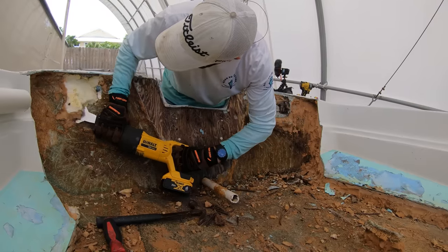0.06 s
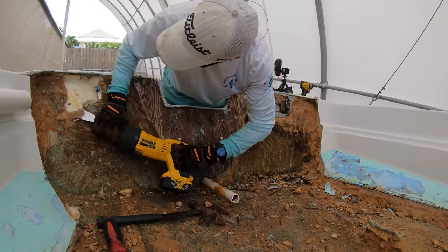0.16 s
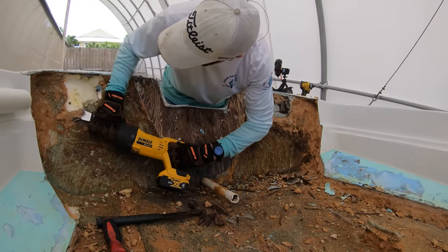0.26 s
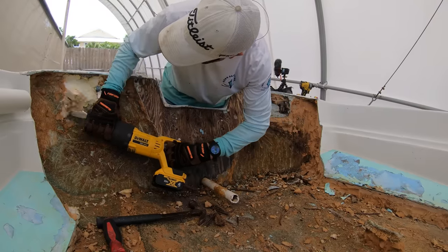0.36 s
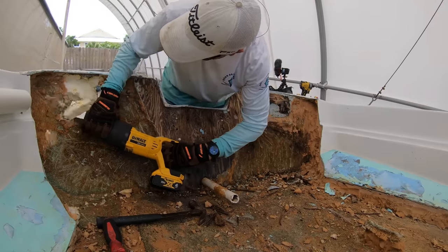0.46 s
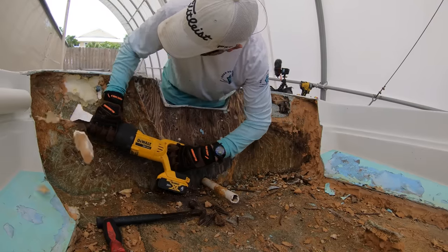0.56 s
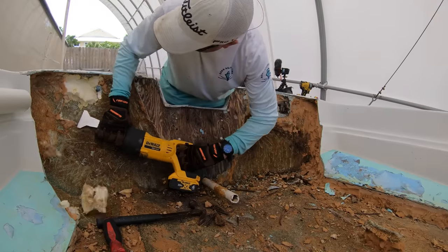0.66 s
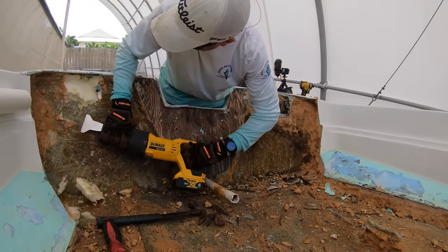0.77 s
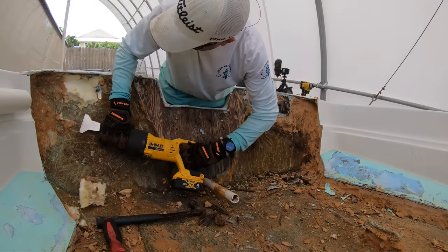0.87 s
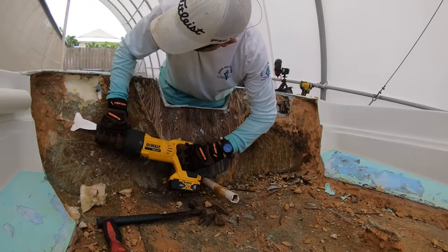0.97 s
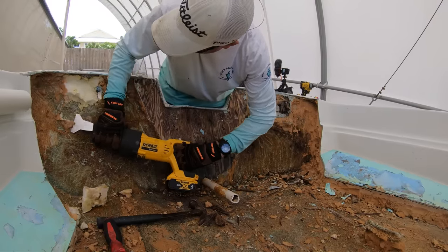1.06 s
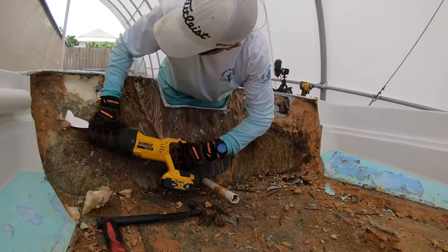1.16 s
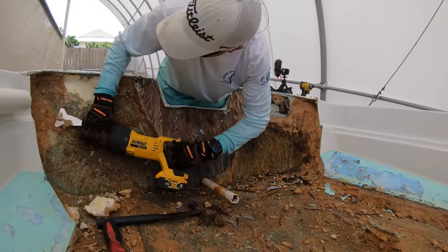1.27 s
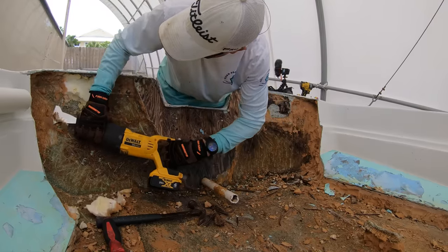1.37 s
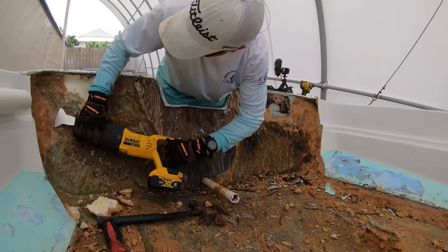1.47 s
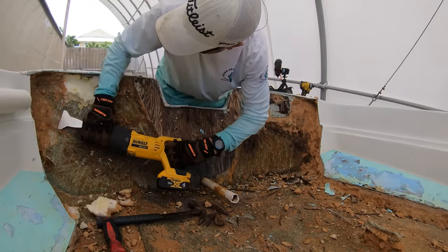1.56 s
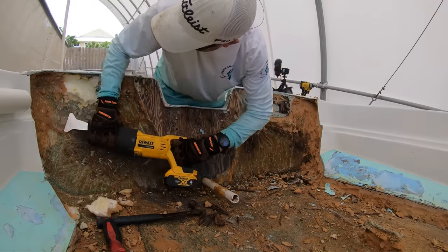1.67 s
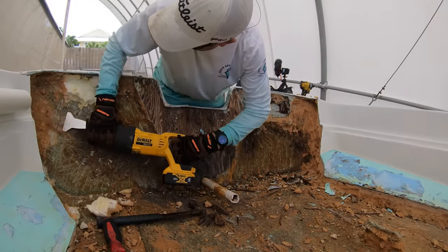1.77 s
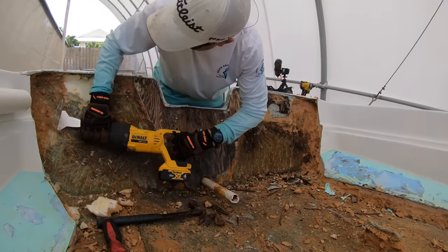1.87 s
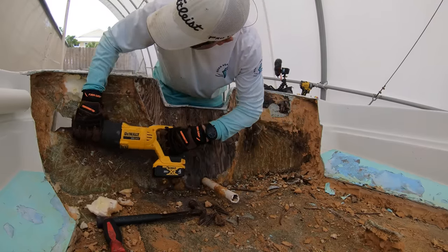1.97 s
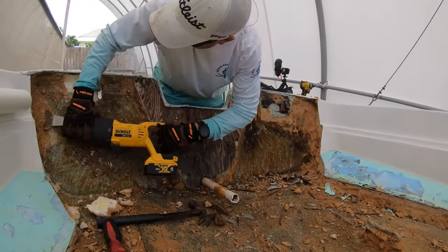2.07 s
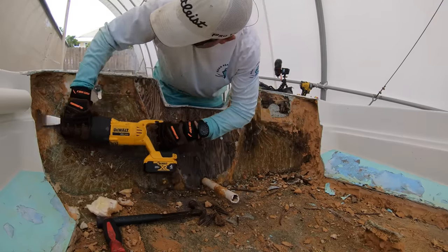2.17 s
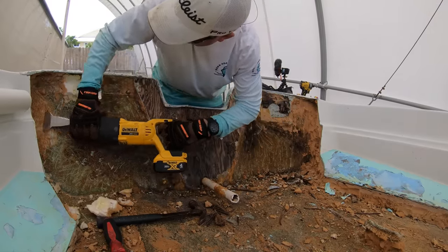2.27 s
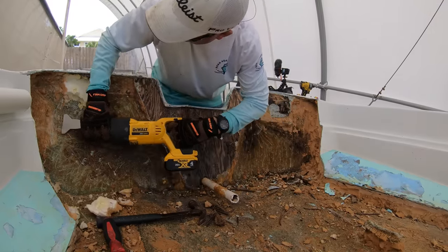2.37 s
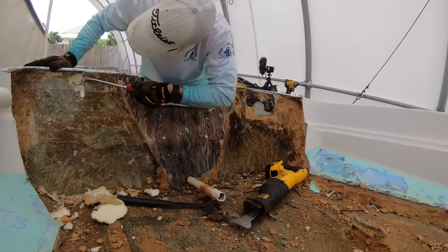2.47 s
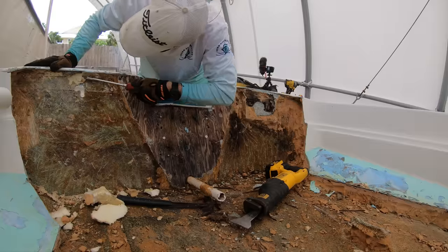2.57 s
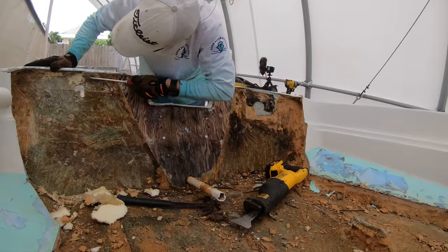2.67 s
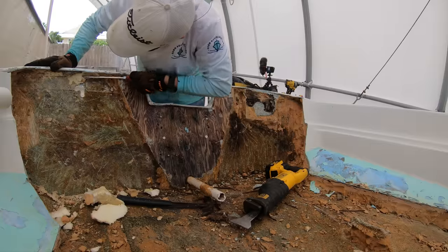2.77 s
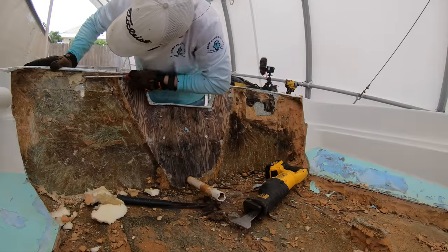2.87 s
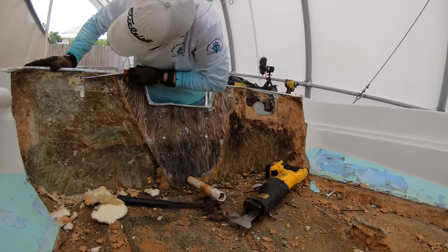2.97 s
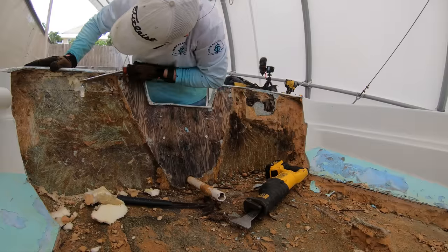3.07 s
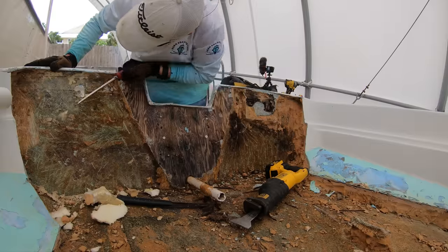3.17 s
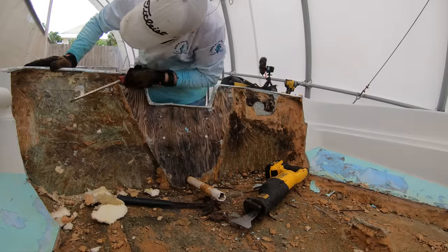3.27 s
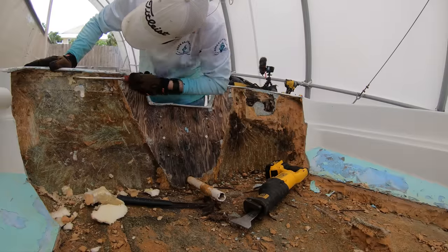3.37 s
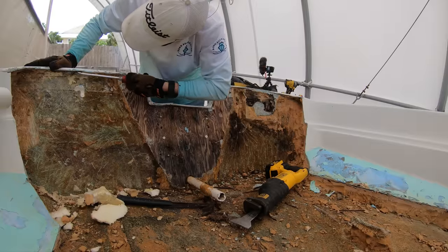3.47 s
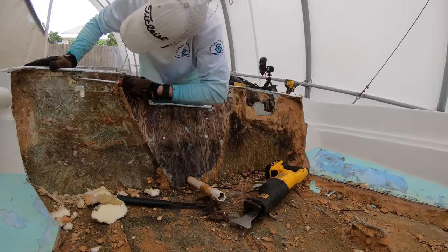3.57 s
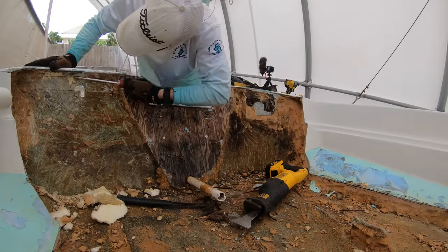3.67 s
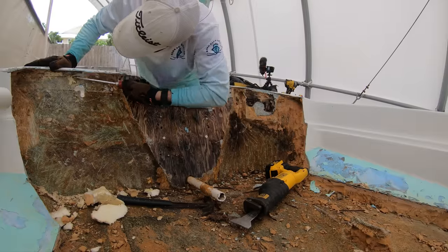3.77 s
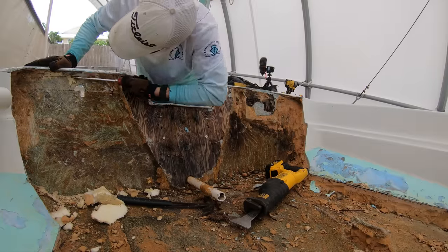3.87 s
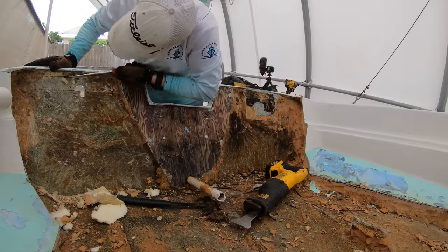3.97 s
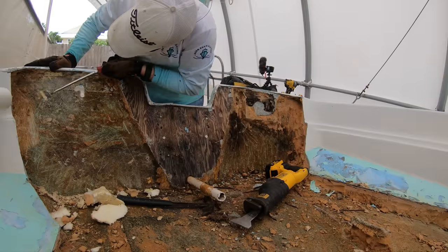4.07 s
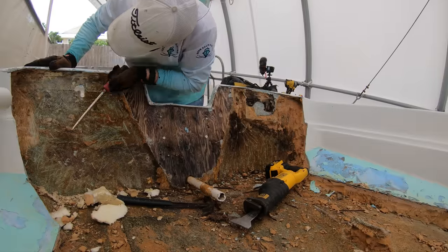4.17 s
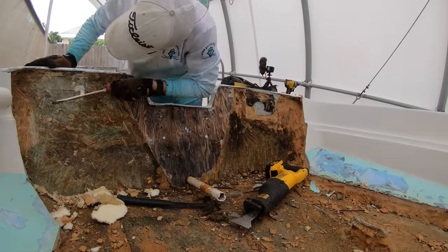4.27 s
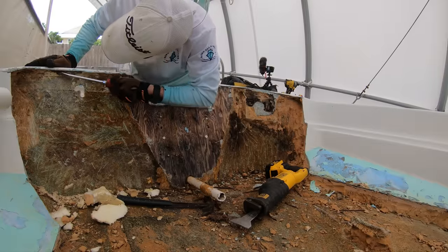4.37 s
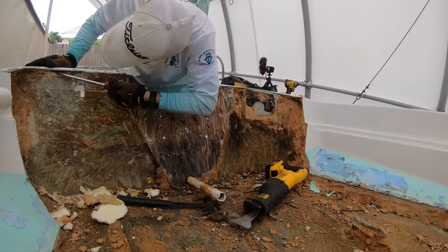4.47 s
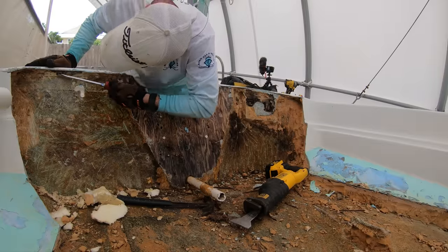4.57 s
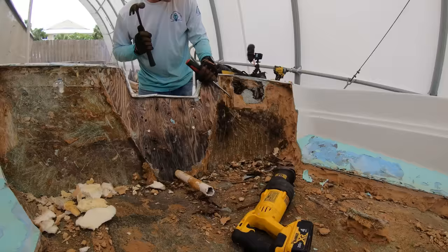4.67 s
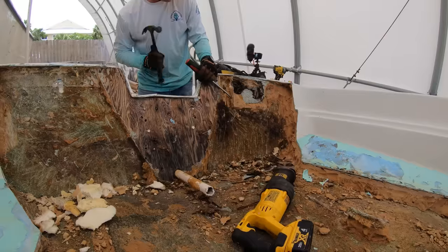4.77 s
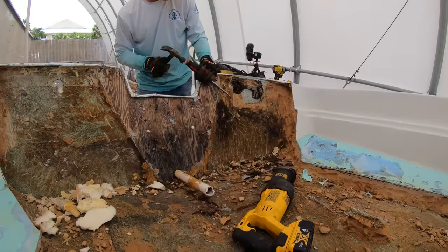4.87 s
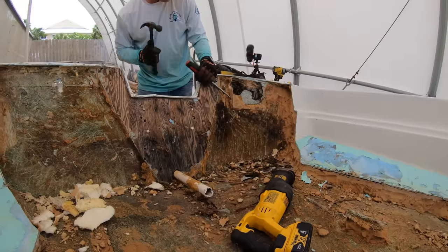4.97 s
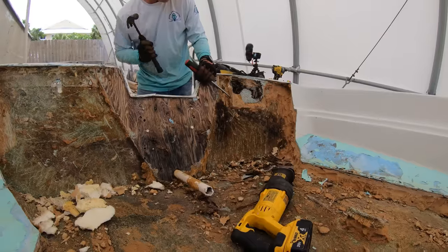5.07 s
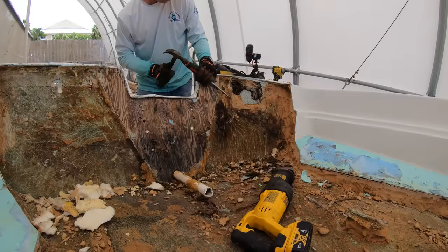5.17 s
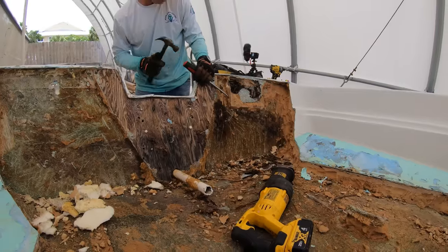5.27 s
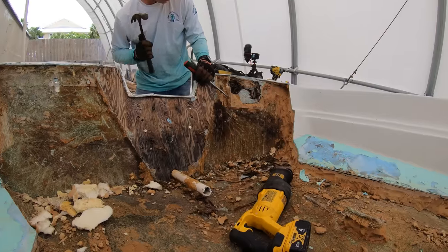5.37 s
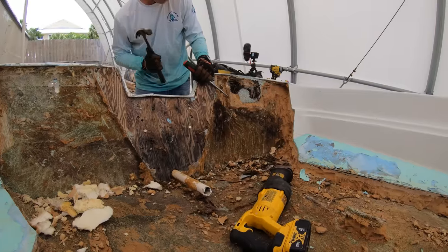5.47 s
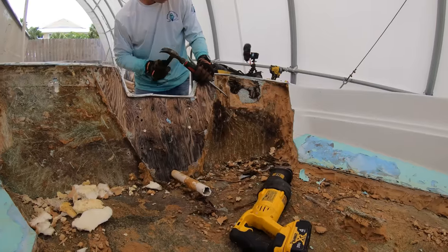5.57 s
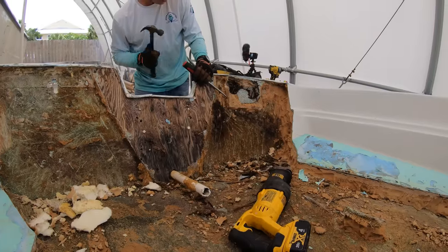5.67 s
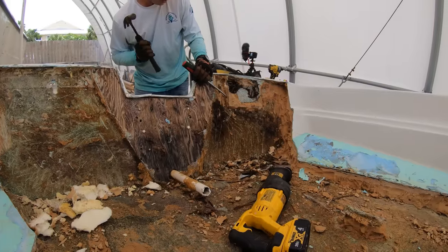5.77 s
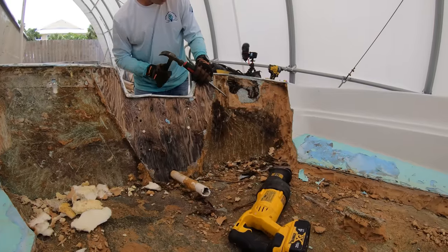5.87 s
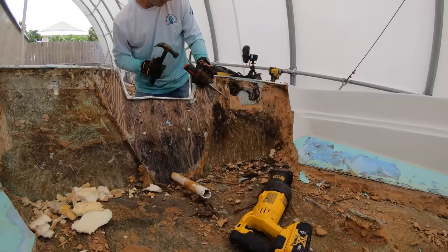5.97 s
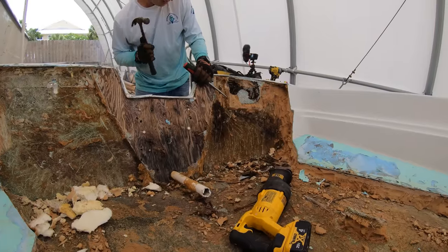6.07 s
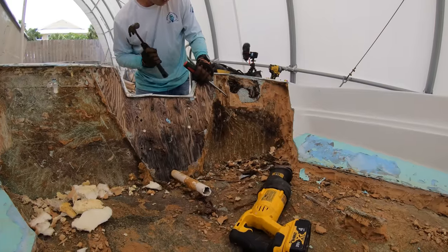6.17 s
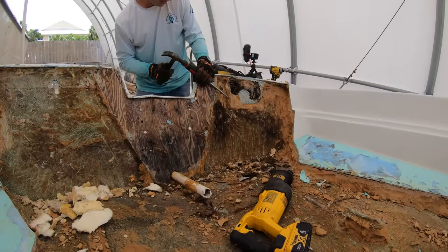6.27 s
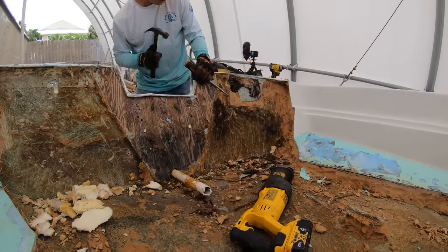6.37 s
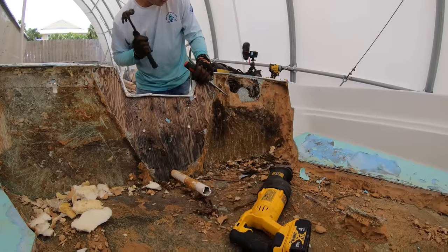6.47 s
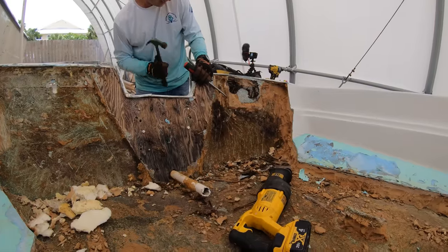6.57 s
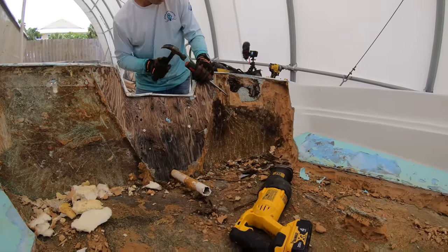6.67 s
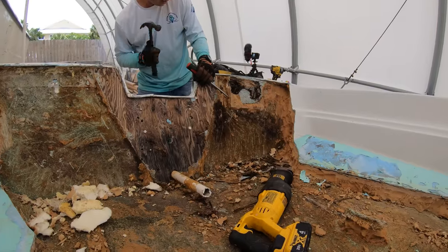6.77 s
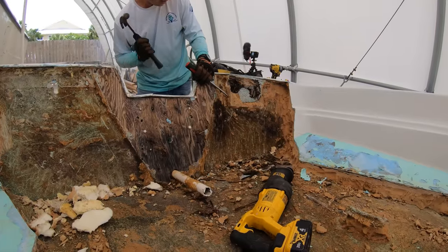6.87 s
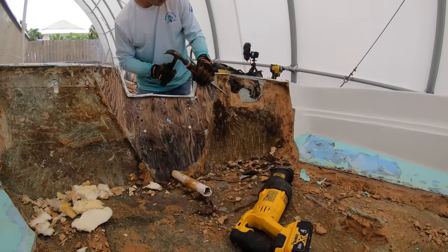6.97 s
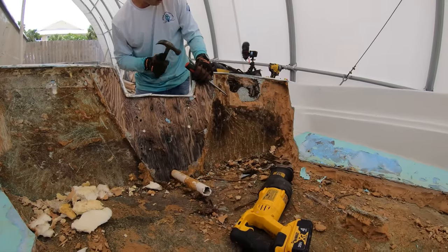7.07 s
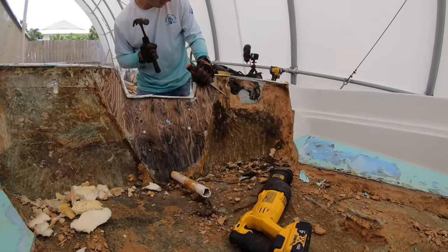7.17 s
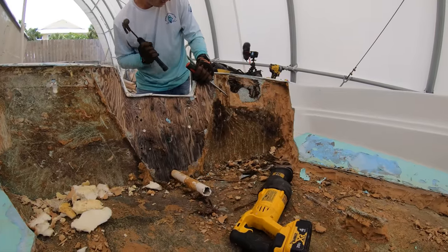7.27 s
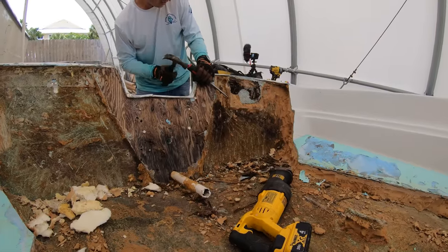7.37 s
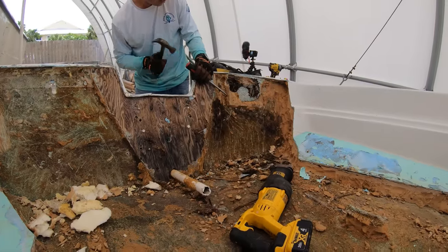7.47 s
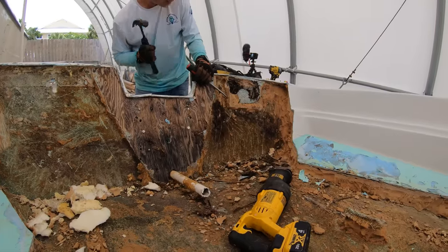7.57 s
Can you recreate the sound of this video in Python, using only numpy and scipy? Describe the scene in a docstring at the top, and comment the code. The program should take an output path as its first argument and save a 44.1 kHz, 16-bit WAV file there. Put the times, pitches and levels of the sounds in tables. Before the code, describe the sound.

A fast blade rattles and rasps on a loose wooden panel, stops and restarts twice, with splinter snaps and soft bumps between. Then a hand bar drags, creaks and jabs with low knocks, in wider stereo and more hiss. Finally a hammer hits a chisel about three times a second, sharp steel cracks over hollow wood, with ticking bounces. Near microphone, short hull reflections, faint wind rumble.

```python
"""A hammer drives a chisel eight times into a boat's rotten transom under a plastic shelter: modes of steel, wood
and transom with noise cracks, then a rebounding chisel on the loose panel, in modal clacks, rings and ticks.
Before that a reciprocating saw with a scraper blade chatters in three bursts: trains of contacts excite the panel
and shape grains of torn fibre. A hand bar then scrapes (swelling grains), creaks and knocks (noise and modes).
Chips and bumps are short bursts and modes; behind it lie a distant wash, hiss and wind rumble of coloured noise."""
import sys
import numpy as np
from scipy import signal
from scipy.fft import rfft, irfft, next_fast_len
from scipy.io import wavfile
from scipy.ndimage import uniform_filter1d

SR = 44100
rng = np.random.default_rng(int(sys.argv[2]) if len(sys.argv) > 2 else 0)


def generate_wav(signal):
    """Clip the signal to [-1, 1] and save it as 16-bit WAV at the path in sys.argv[1]."""
    frames = np.transpose(np.atleast_2d(signal))
    scaled = np.clip(frames, -1, 1) * 32767
    pcm = np.round(scaled).astype(np.int16)
    wavfile.write(sys.argv[1], SR, pcm)


N = 336042
TIME = np.arange(N) / SR
RING_SAMPLES = 26460  # longest single sound, 0.6 s

# Modes [f/Hz, relative level/dB, t60/s]: panel under the blade
PANEL_MODES = [(62.6, -7, 0.27), (75.7, -4, 0.25), (113.3, 4.5, 0.33), (127.7, 6.5, 0.14),
               (173.2, -8, 0.31), (193.2, -9, 0.33), (228.1, -2, 0.14), (319, -16.5, 0.17),
               (380.5, -20.5, 0.17), (468.4, -13.5, 0.058), (663, -28.5, 0.13)]
# whole transom under the chisel [f/Hz, relative level/dB, t60/s]
TRANSOM_MODES = [(63, -19, .8), (81, -13, .35), (93, -7, .55), (104, -9, .5), (122, -8, .35), (139, 0, .36),
                 (174, -7, .35), (229, 0, .25), (271, -4, .27), (305, -9, .22), (397, -19, .26),
                 (456, -21, .25), (501, -12, .18)]
# wood giving way right under the tool [f/Hz, relative level/dB, t60/s]
THUMP_MODES = [(142.5, 7, 0.057), (219.4, 4.5, 0.074), (299.7, 3, 0.075), (378, -11.5, 0.075)]
# wood under a full blow [f/Hz, relative level/dB, t60/s]
WOOD_MODES = [(607, 0, 0.13), (688, 3, 0.065), (768, 7, 0.098), (837, -1, 0.071), (990, 3, 0.059),
              (1079, -5, 0.25), (1210, 0.5, .15), (1275, -4, 0.13), (1428, -4.5, .14), (1687, -17.5, 0.13),
              (1976, -6, 0.14)]
# wood levered by the bar [f/Hz, relative level/dB, t60/s]
PRIED_MODES = [(318, 2, .17), (400, -6, .15), (468, 2, .17), (554, -3, .14), (637, -6, .12), (745, -6, .11),
               (1206, -10, .14), (1308, -9, .12), (2100, -11, .09)]
# steel scraper blade [f/Hz, relative level/dB, t60/s]
BLADE_MODES = [(1180, 0, .05), (2020, -2, .06), (2400, 1, .06), (2950, -2, .04), (3850, -6, .05),
               (4630, -7, .035), (7530, -12, .04), (8550, -8, .05)]
# Noise spectra [f/Hz, relative level/dB]: an edge dragging over wood
SCRAPE_SPECTRUM = [(700, 2), (1200, -28.5), (2100, -5), (3900, -7.5), (5500, -9.5), (7200, -8.5),
                   (10000, -20), (15500, -26)]
# knock on the panel [f/Hz, relative level/dB]
KNOCK_SPECTRUM = [(200, 10.5), (320, 7), (480, 1), (700, 0), (930, -16), (1200, -19.5), (1700, -32),
                  (2100, -15.5), (3000, -43)]
# dull knock of the rotten core [f/Hz, relative level/dB]
CORE_SPECTRUM = [(250, 4), (330, 5), (450, -14.5), (620, 0), (800, -6.5), (1300, -8), (1700, -16)]
# crack of a hard impact [f/Hz, relative level/dB]
CRACK_SPECTRUM = [(1500, -14.5), (2500, 2), (3250, -1), (3800, -4), (5000, -6), (6000, -7), (8000, -16),
                  (9500, -25), (11500, -39.5), (15000, -44.5)]


def from_db(db):
    """Decibels to amplitude gain."""
    return 10 ** (np.asarray(db) / 20)


def rms_one(x):
    """Scale to unit power."""
    return x / np.sqrt(np.mean(x ** 2) + 1e-20)


def in_time(rows):
    """Interpolate the columns of a curve at every sample."""
    s, *columns = np.transpose(rows)
    return [np.interp(TIME, s, column) for column in columns]


def in_steps(rows):
    """The columns of a table at every sample; each row holds until the next begins."""
    rows = np.array(rows)
    return rows[np.searchsorted(rows[1:, 0], TIME), 1:].T


def at_hz(points, hz):
    """Read a table on a log-frequency axis."""
    f, value = np.transpose(points)
    return np.interp(np.log(np.maximum(hz, 1)), np.log(f), value)


def during(rows):
    """A gate open from the first row's time to the last's, with soft edges."""
    is_open = 1. * (TIME >= rows[0][0]) * (TIME <= rows[-1][0])
    return uniform_filter1d(is_open, size=300)


def coloured(x, spectrum):
    """Give noise a spectrum that falls steeply beyond its ends, at unit power."""
    size = next_fast_len(len(x))
    hz = np.maximum(np.arange(size // 2 + 1) * SR / size, 1)
    ends = np.minimum(1, np.minimum(hz / spectrum[0][0], spectrum[-1][0] / hz)) ** 4
    shaped = rfft(x, size) * from_db(at_hz(spectrum, hz)) * ends
    return rms_one(irfft(shaped, size)[:len(x)])


def evened(x, size):
    """Take the slow swells out of a texture by dividing by its running level."""
    return x / np.sqrt(np.abs(uniform_filter1d(x ** 2, size)) + 1e-9)


def add(out, s, sound):
    """Mix a sound in at a time in seconds."""
    start = max(round(s * SR), 0)
    out[start:start + len(sound)] += sound[:max(N - start, 0)]


def modes(table, vary_db, detune=0.0087, rise=0.00026, alternate=True):
    """One stroke on a body: decaying sines, each with a strength and a slight pitch shift of its own."""
    t = np.arange(RING_SAMPLES) / SR
    hz, db, t60 = np.transpose(table)[:, :, None]
    gain = from_db(db + vary_db * rng.standard_normal(hz.shape))
    if alternate:  # neighbouring modes start in opposite directions
        gain = gain * (-1.) ** np.arange(len(hz))[:, None]
    hz = hz * (1 + detune * rng.standard_normal(hz.shape))
    ring = np.sum(gain * from_db(-60 * t / t60) * np.sin(2 * np.pi * hz * t), axis=0)
    onset = 1 - np.exp(-(t / rise) ** 2)
    return ring * onset / np.sqrt(np.sum(gain ** 2))


def burst(spectrum, t60, tail_db, rise, patchy_db=0):
    """Crowded, damped modes as noise: a quick decay, even or lumpy, over the hull's own ring."""
    # ring of the hull and shelter [f/Hz, t60/s]
    hull_t60 = [(100, 0.58), (400, 0.69), (1100, 0.42), (3000, 0.45), (8000, 0.45)]
    t = np.arange(RING_SAMPLES) / SR
    strongest_hz = max(spectrum, key=lambda point: point[1])[0]
    tail = from_db(tail_db - 60 * t / at_hz(hull_t60, strongest_hz))
    decay = np.hypot(from_db(-60 * t / t60), tail)
    lumps = from_db(patchy_db * rms_one(uniform_filter1d(rng.standard_normal(RING_SAMPLES), size=130)))
    noise = coloured(rng.standard_normal(RING_SAMPLES) * lumps, spectrum)
    onset = 1 - np.exp(-(t / rise) ** 2)
    return evened(noise, size=900) * decay * onset


def grains(per_s, spread_db):
    """Fibres break at random, a few of them much louder than the rest."""
    sizes = from_db(spread_db * np.minimum(rng.exponential(1, N), 4))
    breaks = rng.random(N) < per_s / SR
    return rms_one(breaks * sizes * rng.standard_normal(N))


def fading(clicks, t60):
    """Each click leaves an exponentially dying envelope."""
    return signal.lfilter([1], [1, -from_db(-60 / (t60 * SR))], clicks + 1e-18)


def air():
    """Outdoor wash, hiss and wind rumble as coloured noise that steps between three levels, with one gust in
    the rumble."""
    # background levels, each holding until the next step [start t/s, wash level/dB, hiss level/dB, rumble
    # level/dB]
    stages = [(0, -61.5, -70, -41), (2.495, -50.5, -62, -42), (4.73, -58.5, -71, -33.5)]
    # distant outdoor wash [f/Hz, relative level/dB]
    wash_spectrum = [(150, 1), (270, -12.5), (450, 1), (700, -4), (1230, -6), (2000, -11), (3000, -19)]
    # high hiss [f/Hz, relative level/dB]
    hiss_spectrum = [(3000, 4.5), (6800, 5.5), (8200, -1.5), (10000, -17.5), (14000, -38)]
    # wind rumble about the shelter [f/Hz, relative level/dB]
    rumble_spectrum = [(15, -3), (30, -6.5), (45, 0), (70, -2.5), (110, -3.5), (180, -10), (300, -21),
                       (600, -39.5)]
    wash, hiss, rumble = from_db(in_steps(stages))
    # full from 2.725 to 3.12 s, after a 31 ms rise and before a 0.25 s fall
    gust = np.minimum((TIME - 2.725) / 0.031, (3.12 - TIME) / 0.25).clip(-1, 0) + 1
    rumble = rumble + from_db(-29) * gust
    out = np.zeros(N)
    for gain, spectrum in [(wash, wash_spectrum), (hiss, hiss_spectrum), (rumble, rumble_spectrum)]:
        out += gain * evened(coloured(rng.standard_normal(N), spectrum), size=8000)
    return out


def panel_bumps(boom_db=-2, knock_db=-24):
    """The tool or a hand bumps the loose panel softly, and once a piece of foam drops onto it: low modes boom
    and the wood knocks faintly."""
    # bumps, the one at 0.69 s a falling piece of foam [t/s, level before the trims/dB]
    bumps = [(0.587, -27), (.69, -22), (1.66, -10.5), (1.797, -9), (5.003, -10.5)]
    out = np.zeros(N)
    for s, db in bumps:
        add(out, s, from_db(db + boom_db) * modes(THUMP_MODES[:1] + PANEL_MODES[1:4], vary_db=8.5, rise=0.002))
        add(out, s, from_db(db + knock_db) * burst(KNOCK_SPECTRUM, t60=0.11, tail_db=-20, rise=0.0037))
    return out


def chips(snap_db=-6, ring_db=-6):
    """Dry noise snaps of splinters and falling crumbs, and clinks of the free blade on the wood."""
    # loudest splinters snapping and chips landing [t/s, level before the trim/dB]
    snaps = [(0.5013, -43), (0.56, -50), (0.682, -47), (0.775, -43.5), (0.809, -47), (0.929, -47),
             (2.6324, -35.5), (2.903, -35), (4.583, -38.5)]
    # blade clinks [t/s, level/dB; its ring is trimmed below this]
    clinks = [(1.597, -42), (1.663, -42.5), (1.754, -39), (1.845, -36.5), (1.877, -57)]
    # noise of a clink [f/Hz, relative level/dB]
    clink_spectrum = [(1000, 2), (1500, 3), (2300, -1), (3300, -10), (4700, -12), (7000, -12), (8600, -8),
                      (11000, -33)]
    out = np.zeros(N)
    crumbs = [(s, -48) for s in rng.uniform(0.2, 1, 5)]  # five, at random times
    for s, db in snaps + crumbs:
        add(out, s, from_db(db + snap_db) * burst(SCRAPE_SPECTRUM[:-1], t60=0.036, tail_db=-32, rise=0.00051))
    for s, db in clinks:
        add(out, s, from_db(db) * burst(clink_spectrum, t60=0.041, tail_db=-12, rise=0.0013))
        add(out, s, from_db(db + ring_db) * modes(BLADE_MODES, vary_db=3, rise=0.002))
    return out


def hand_scraping(level_db=-1):
    """The bar's edge drags through crumbling wood: swelling grains, with dull rubs under pressure."""
    # strokes of the bar [peak t/s, level before the trim/dB, swell t/s, fade t/s]
    strokes = [(2.638, -48, .04, .13), (2.722, -44.5, 0.055, 0.14), (2.938, -37.5, 0.072, 0.29),
               (3.103, -36, 0.087, 0.025), (4.008, -45, 0.17, 0.11)]
    # dull rubbing of wood under the tool [t/s, half length/s, level/dB]
    rubs = [(0.71, .04, -51), (3.438, 0.0053, -33), (3.992, 0.022, -35.5), (4.408, 0.0061, -38.5)]
    # the bar rests on the wood and drags lightly between strokes
    pressure = from_db(-57) * during([(2.5,), (3.2,)])
    for s, db, swell, fade in strokes:
        from_peak = np.maximum((s - TIME) / swell, (TIME - s) / fade).clip(0, 10)
        pressure = np.hypot(pressure, from_db(db - 27.5 * from_peak))  # 27.5 dB per swell or fade time
    crumbling = grains(3000, spread_db=3.5)
    rubbing = sum(from_db(db) * np.exp(-((TIME - s) / width) ** 2) for s, width, db in rubs)
    scrape = from_db(level_db) * pressure * coloured(crumbling, SCRAPE_SPECTRUM)
    return scrape + rubbing * coloured(crumbling, CORE_SPECTRUM)


def bar_creaks():
    """The bar twists in the wood: short, bright noise creaks of steel against wood."""
    # creaks [t/s, level/dB]
    creaks = [(2.932, -38), (3.522, -41), (3.544, -41), (4.057, -33.5)]
    # steel against wood [f/Hz, relative level/dB]
    creak_spectrum = [(2800, -10), (3500, 1), (4200, 1), (5000, -12), (7000, -8), (10000, -35)]
    out = np.zeros(N)
    for s, db in creaks:
        add(out, s, from_db(db) * burst(creak_spectrum, t60=0.042, tail_db=-37, rise=0.0025))
    return out


def bar_knocks(knock_db=-6, wood_db=-2, thump_db=-4, thud_db=-3, crack_db=-3, core_db=-13):
    """The bar jabs into the panel: the wood cracks, rings and gives, and the rim booms on."""
    # jabs [t/s, knock level/dB, thud level/dB, crack level/dB; all before the trims]
    jabs = [(2.833, -28, -30.5, -62), (3.103, -23, -20.5, -34), (3.443, -15.5, -16.5, -39.5),
            (3.521, -34, -23, -42), (4.007, -11.5, -13.5, -34), (4.179, -36.5, -37.5, -71),
            (4.411, -21.5, -22.5, -46)]
    # rim of the panel under the bar [f/Hz, relative level/dB, t60/s]
    rim_modes = [(62.5, -11, 0.6), (88.6, -10.5, 0.95), (103.35, -6, 0.46), (145, -1.5, 0.32),
                 (176.2, -3.5, 0.17), (210, -8.5, 0.33), (280.5, -16.5, 0.21), (340.3, -19, 0.14)]
    out = np.zeros(N)
    for s, knock, *_ in jabs:
        add(out, s, from_db(knock + wood_db) * modes(PRIED_MODES, vary_db=2, detune=0.008, rise=0.004))
    # 19 ms after each jab the wood gives and the bar lands again, duller and heavier
    landings = [(s + 0.019, knock - 8, thud + 8, crack - 7) for s, knock, thud, crack in jabs]
    for s, knock, thud, crack in jabs + landings:
        add(out, s, from_db(knock + core_db) * burst(CORE_SPECTRUM, t60=0.14, tail_db=-35, rise=0.0012))
        add(out, s, from_db(knock + knock_db) * burst(KNOCK_SPECTRUM, t60=0.18, tail_db=-30.5, rise=0.003))
        add(out, s, from_db(thud + thump_db) * modes(THUMP_MODES, vary_db=0.5, detune=0.077, rise=0.00088))
        add(out, s, from_db(thud + thud_db) * modes(rim_modes, vary_db=6.5, detune=0.015, rise=0.001))
        snap = burst(CRACK_SPECTRUM, t60=0.065, tail_db=-18.5, rise=0.00059, patchy_db=4)
        add(out, s, from_db(crack + crack_db) * snap)
    return out


def blade_catches(tear_db=-8, waver=0.01):
    """The blade catches on a splinter (wood modes and a crack), or skates and squeals (a wavering sine)."""
    # catches on a splinter [t/s, level/dB; the tear is trimmed below this]
    catches = [(.008, -27), (0.072, -23.5), (0.166, -23.5), (.191, -24.5), (.311, -26), (.949, -41.5),
               (1.288, -30.5), (1.345, -29.5), (1.662, -49), (2.127, -29.5)]
    # squeals of the lightly pressed blade [t/s, length/s, f/Hz, level/dB]
    squeals = [(1.864, 0.045, 2480, -41), (1.879, 0.039, 550, -31.5), (1.936, .05, 2470, -40)]
    out = np.zeros(N)
    for s, db in catches:
        add(out, s, from_db(db) * modes(WOOD_MODES, vary_db=4, detune=0.0697))
        add(out, s, from_db(db + tear_db) * burst(CRACK_SPECTRUM, t60=0.031, tail_db=-22, rise=0.00094))
    for s, length, hz, db in squeals:
        swell = np.hanning(int(length * SR))
        wander = rms_one(uniform_filter1d(rng.standard_normal(RING_SAMPLES), size=200))[:len(swell)]
        pitch = hz * (1 + waver * wander)
        add(out, s, from_db(db) * swell * np.sin(2 * np.pi * np.cumsum(pitch) / SR))
    return out


def chatter(contacts, count=7, stay_s=0.07):
    """The blade moves at random among patches of wood, each clacking at its own pitches."""
    patch = rng.integers(0, count, N)[(TIME / stay_s).astype(int)]
    clacks = np.zeros(N)
    for k in range(count):
        body = modes(PRIED_MODES + BLADE_MODES[:4], vary_db=2, detune=0.1002)
        clacks += signal.oaconvolve(contacts * (patch == k), body)[:N]
    return evened(clacks, size=3000)


def power_scraper(return_db=-5, vary_db=3, bite_t60=0.061, rasp_db=-32.5, grit_db=-39.5,
                  linger_db=-16, linger_t60=2.3, snags_per_s=10, snag_db=-2):
    """The blade hits on each push and, more lightly, each return; contacts shake the panel and tear fibres."""
    # bursts [start t/s, strokes per s, timing unevenness/stroke, upper modes' level/dB,
    #         panel boom level/dB, wood rasp trim/dB, blade ring against fibres/dB]
    bursts = [(0, 48, 0.026, -7, -14.5, 2, -26), (.92, 42.5, 0.061, 7, -19, 0.5, -20),
              (1.78, 38.4, 0.056, 10.5, -19.5, 0, -20)]
    # how hard the blade bites, one curve per burst [t/s, level/dB]
    bite_curves = [
        [(0.0, -35), (0.126, -41.5), (0.19, -37.5), (0.304, -38), (0.306, -36), (0.428, -43.5), (0.482, -66),
         (0.516, -60.5), (0.54, -93)],
        [(0.935, -83), (0.957, -50), (1.127, -38), (1.197, -43.5), (1.347, -35.5), (1.357, -39.5),
         (1.555, -42.5), (1.691, -65.5), (1.73, -92)],
        [(1.83, -67), (1.85, -55), (1.862, -72), (1.878, -44.5), (2.074, -40.5), (2.154, -34), (2.286, -31),
         (2.356, -49), (2.47, -71)],
    ]
    # rasp of the wood [f/Hz, relative level/dB]
    rasp_spectrum = [(300, 7.5), (400, -5), (560, -0.5), (850, -13), (1000, -9.5), (1400, -10),
                     (1800, -29.5), (2100, -40), (2800, -28)]
    # grit of torn fibres [f/Hz, relative level/dB]
    grit_spectrum = [(1500, -0.5), (2000, 7), (2450, 4.5), (3100, -1.5), (3860, 0), (4350, -5), (4700, -1),
                     (5500, -5.5), (8600, -10), (11000, -26), (15000, -46)]
    rate, uneven, hardness, boom_db, wood_db, ring_db = in_steps(bursts)
    # a bite of -39.5 dB is the usual effort, 1
    effort = sum(during(curve) * from_db(in_time(curve)[0] + 39.5) for curve in bite_curves).clip(1e-9)
    boom = from_db(boom_db) * effort ** 0.65  # the boom follows only part of the swing
    # the hull booms on after each burst
    linger = from_db(linger_db) * fading(boom, linger_t60) * np.log(1000) / (linger_t60 * SR)
    boom = np.hypot(boom, linger)

    # two contacts a stroke, at uneven times
    at = np.flatnonzero(np.diff(np.floor(2 * np.cumsum(rate) / SR), prepend=-1))
    chance = rng.standard_normal((len(at), 2))
    is_return = np.arange(len(at)) % 2
    at = np.clip(at + chance[:, 0] * uneven[at] * SR / rate[at], 0, N - 1).astype(int)
    contacts = np.zeros(N)
    contacts[at] = from_db(return_db * is_return + vary_db * chance[:, 1])

    shaken = signal.fftconvolve(contacts, modes(PANEL_MODES, vary_db=1))[:N]
    # harder contact brings out the modes above 155 Hz
    soft = signal.sosfiltfilt(signal.butter(4, 155, fs=SR, output="sos"), shaken)
    panel = evened(soft + from_db(hardness) * (shaken - soft), size=3000)

    # now and then the edge snags and rips a bundle of fibres
    snags = (rng.random(N) < snags_per_s / SR) * from_db(snag_db)
    bite = fading(contacts + snags, bite_t60)
    rasp = evened(coloured(grains(3500, spread_db=2) * (bite + 0.45), rasp_spectrum), size=2400)
    wood = 0.85 * rasp + 0.5 * chatter(contacts)
    tearing = grains(14000, spread_db=0.5) * (bite + 0.6)
    # the torn fibres also keep the steel blade ringing
    steel = evened(signal.fftconvolve(tearing, modes(BLADE_MODES, vary_db=0.5))[:N], size=2400)
    fibres = evened(coloured(tearing, grit_spectrum), size=2400) + from_db(ring_db) * steel
    wood_gain = from_db(rasp_db + wood_db) * effort ** 0.86
    return boom * panel + wood_gain * wood + from_db(grit_db) * effort * fibres


def hollow_ring(db):
    """Wood around a wedged chisel rings hollow: a light tap favours lower modes, a hard one upper."""
    # pitch that a tap favours [ring level/dB, f/Hz]
    favoured = [(-29, 735), (-18, 900)]
    # hollow wood around a tight chisel [f/Hz, relative level before the favouring/dB, t60/s]
    hollow_modes = [(722, 0, .15), (756, 0, .16), (826, 1, .14), (866, -2, .12), (948, -4, .12)]
    centre = np.interp(db, *np.transpose(favoured))
    # a mode loses 1 dB for every 16 Hz from the favoured pitch
    table = [(hz, level - abs(hz - centre) / 16, t60) for hz, level, t60 in hollow_modes]
    return from_db(db) * modes(table, vary_db=3, detune=0.012, rise=0.001, alternate=False)


def rattles(clack_db=-1, ping_db=1, thump_db=8, thud_db=-2, firm_db=-21):
    """The swinging panel meets the chisel: wedged, it rings hollow; loose, its shank pings; firm hits boom."""
    # rebounds [t/s, clack level/dB, hollow ring level/dB, shank ping level/dB, steel tick level/dB;
    #           clack and ping before the trims]
    rebounds = [(4.878, -11.5, -33, -27.5, -27), (4.913, -21.5, -47, -42, -41.5),
                (5.031, -38, -54, -50, -56), (5.05, -34.5, -49, -51, -48), (5.231, -13, -33, -36, -30),
                (5.263, -43, -47, -33, -47), (5.29, -23, -38, -38, -43), (5.31, -32.5, -48, -41, -47),
                (5.376, -29, -50, -37.5, -41.5), (5.399, -55, -61, -63, -48), (5.472, -50, -49, -55, -53),
                (5.599, -17, -26, -32.5, -41.5), (5.622, -18, -29, -36, -45), (5.666, -23, -47, -37.5, -46),
                (5.725, -32.5, -52, -41, -48), (5.76, -39, -51, -50, -40.5), (5.944, -15.5, -25, -50, -52),
                (5.963, -15.5, -35, -53, -36.5), (6.022, -22.5, -22.5, -58, -33),
                (6.048, -44, -51, -63, -45), (6.103, -31, -33, -64, -67), (6.305, -12, -22.5, -34, -37),
                (6.328, -21.5, -26.5, -38, -44), (6.387, -27.5, -33, -45, -51), (6.433, -36, -30, -44, -54),
                (6.46, -25, -30.5, -37, -46), (6.487, -30, -36, -43.5, -41), (6.682, -21, -22, -40.5, -41),
                (6.698, -13, -23, -38, -35.5), (6.75, -23.5, -23, -39, -39.5),
                (6.802, -34, -31.5, -51, -54), (6.829, -30, -33.5, -53, -49),
                (6.865, -49, -34.5, -54.5, -57), (7.048, -13, -19.5, -39, -34), (7.072, -19, -31, -40, -37),
                (7.179, -25.5, -35.5, -52, -53), (7.227, -43, -38, -59, -55),
                (7.426, -11.5, -17, -24.5, -29.5), (7.574, -31, -33.5, -53, -52)]
    # wood about the chisel [f/Hz, relative level/dB, t60/s]
    clack_modes = [(403, 2, 0.059), (731, 4, 0.05), (783, 3.5, 0.023), (879, -10, 0.083), (960, -11, 0.14),
                   (1113, -7.5, 0.045), (1270, -9, 0.11), (1330, 1, 0.03), (1606, -12.5, 0.098)]
    # chisel's shank [f/Hz, relative level/dB, t60/s]
    shank_modes = [(1930, -4, .07), (1993, 5, .1), (2060, -1, .08)]
    # steel tick [f/Hz, relative level/dB]
    tick_spectrum = [(2500, -5), (3600, -55), (4000, 14), (4600, 8.5), (5500, -4), (7500, -4.5),
                     (9000, -13.5), (11000, -55)]
    out = np.zeros(N)
    for s, clack, hollow, ping, tick in rebounds:
        push = clack + min(clack - firm_db, 0) / 2  # light rebounds push the panel even less
        add(out, s, from_db(clack + clack_db) * modes(clack_modes, vary_db=0.5, detune=0.02, rise=0.0018))
        add(out, s, hollow_ring(hollow))
        shank = modes(shank_modes, vary_db=4, detune=0.014, rise=0.001, alternate=False)
        add(out, s, from_db(ping + ping_db) * shank)
        add(out, s, from_db(tick) * burst(tick_spectrum, t60=0.024, tail_db=-40.5, rise=0.0011))
        add(out, s, from_db(push + thump_db) * modes(THUMP_MODES, vary_db=0.5, detune=0.048, rise=0.00056))
        add(out, s, from_db(push + thud_db) * modes(TRANSOM_MODES, vary_db=5.5, detune=0.018, rise=0.0012))
    return out


def hammer_blows(crunch_db=-10, wood_db=6, thump_db=-1, crack_db=1, steel_db=-6):
    """Steel cracks and rings; wood knocks, fibres crush as the edge sinks in, and the transom booms."""
    # blows [t/s, strength/dB, hollow ring level/dB]
    blows = [(4.833, -3, -27), (5.185, -1, -29), (5.54, -2.6, -17), (5.895, -4, -16.5),
             (6.259, -3.5, -21.5), (6.625, -3.4, -16), (7.001, -3, -22), (7.38, -2.5, -16.5)]
    # knock of a blow [f/Hz, relative level/dB]
    blow_spectrum = [(220, -7), (330, 1.5), (520, -3), (800, -12.5), (1200, 1.5), (1600, -11), (2000, -5.5),
                     (2400, -32.5), (3200, -39)]
    # steel of hammer and chisel [f/Hz, relative level/dB, t60/s]
    steel_modes = [(2300, -0.5, 0.13), (2970, 0.5, 0.1), (3300, 14.5, 0.05), (3730, -6, 0.33),
                   (5200, -9, 0.14), (6330, -8.5, 0.26), (7100, -11.5, 0.42), (8334, -13, 0.34)]
    # hollow wood around the chisel [f/Hz, relative level/dB, t60/s]
    wedged_modes = [(722, 0, .15), (756, 0, .16), (826, 1, .14), (866, -2, .12), (948, -4, .12)]
    out = np.zeros(N)
    for s, strength, hollow in blows:
        knock, thud, crack = strength - 17.5, strength - 1.5, strength - 26.5
        snap = burst(CRACK_SPECTRUM, t60=0.05, tail_db=-15.5, rise=0.0007, patchy_db=5)
        add(out, s, from_db(crack + crack_db) * snap)
        add(out, s, from_db(crack + steel_db) * modes(steel_modes, vary_db=3, detune=0.003))
        add(out, s, from_db(knock) * burst(blow_spectrum, t60=0.06, tail_db=-16, rise=0.002))
        crunch = burst(blow_spectrum, t60=0.25, tail_db=-6, rise=0.01, patchy_db=5)
        add(out, s, from_db(knock + crunch_db) * crunch)
        add(out, s, from_db(knock + wood_db) * modes(WOOD_MODES, vary_db=2.5, detune=0.01, rise=0.0015))
        add(out, s, from_db(hollow) * modes(wedged_modes, vary_db=3, detune=0.01, rise=0.002))
        add(out, s, from_db(thud + thump_db) * modes(THUMP_MODES, vary_db=3, detune=0.06, rise=0.003))
        add(out, s, from_db(thud) * modes(TRANSOM_MODES, vary_db=2, detune=0.012, rise=0.001))
    return out


def hull(x, low_hz=450):
    """Small nearby surfaces throw back the middle and treble; the bass bends around them."""
    # near reflections from hull sides and shelter [delay t/s, level/dB]
    echoes = [(.0037, -19.5), (.0083, -24.5), (0.014, -18), (0.0212, -21)]
    thrown = signal.sosfilt(signal.butter(2, low_hz, "high", fs=SR, output="sos"), x)
    out = x.copy()
    for delay, db in echoes:
        add(out, delay, from_db(db) * thrown)
    return out


def stereo(mid, scatter_t60=0.027, scatter_hz=900, lean=0.067):
    """A phase-turned side signal, scattered in the treble, widens the image early in the hand work."""
    # stereo spread by pitch [f/Hz, side against mid before the spread over time/dB]
    width_by_pitch = [(30, 3.5), (100, -10), (400, -9.5), (1300, -8.5), (2400, -14), (4400, -13),
                      (8000, -8), (14000, 0.5)]
    # stereo spread over time [t/s, side trim/dB]
    spread = [(2.48, -53), (2.5, 6), (3.6, 3), (3.9, -17), (4.55, -28), (4.72, -58)]
    size = 4096
    scatter = rfft(rng.standard_normal(size) * from_db(-60 * np.arange(size) / SR / scatter_t60))
    hz = np.arange(len(scatter)) * SR / size
    phase = -np.pi / 2 + np.angle(scatter) * hz / (hz + scatter_hz)
    # the in-phase share leans the image to the left
    side_spectrum = (np.exp(1j * phase) + lean) * from_db(at_hz(width_by_pitch, hz))
    response = np.roll(irfft(side_spectrum), size // 2)
    side = signal.fftconvolve(mid, response)[size // 2:][:N]
    side = from_db(in_time(spread)[0]) * side
    return np.array([mid + side, mid - side])


def scene():
    """The work reflects inside the open hull; the outdoor air joins it without those reflections."""
    by_hand = hand_scraping() + chips() + bar_knocks() + bar_creaks()
    by_saw = power_scraper() + blade_catches()
    work = by_saw + panel_bumps() + by_hand + hammer_blows() + rattles()
    return stereo(hull(work) + air())


def record(dry):
    """Peaks are rounded softly and the top is cut, 70 dB down from 15.7 kHz."""
    rounded = 0.95 * np.tanh(dry / 0.95)
    return signal.sosfilt(signal.cheby2(12, 70, 15700, fs=SR, output="sos"), rounded)


dry = scene()
out = record(dry)
generate_wav(out)
```